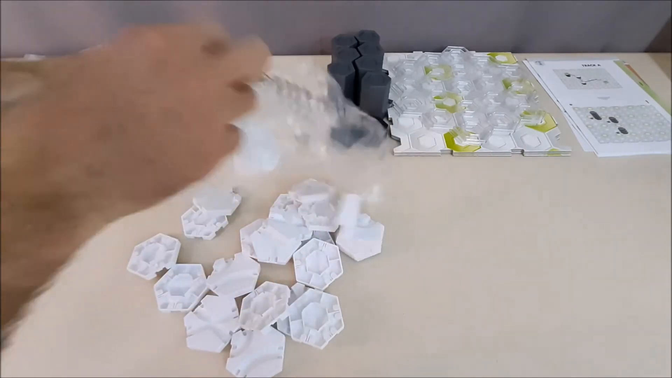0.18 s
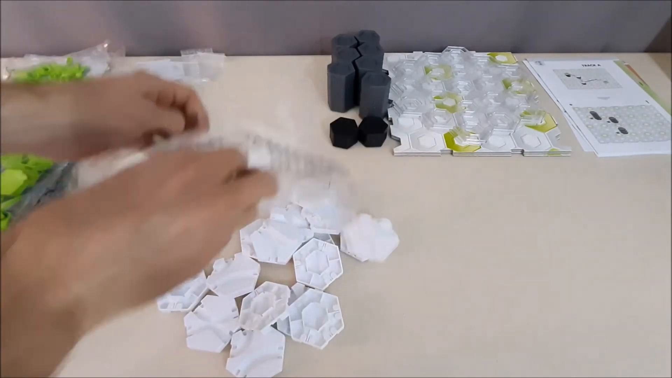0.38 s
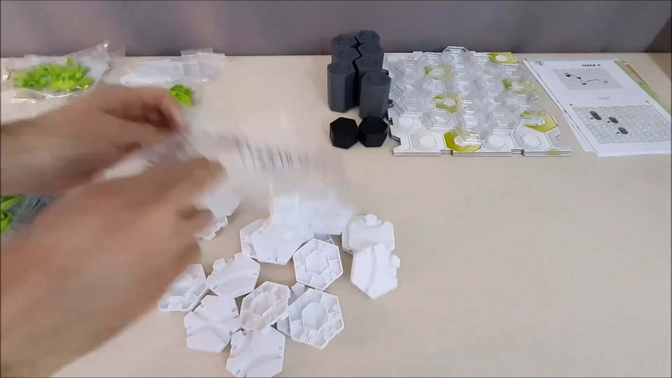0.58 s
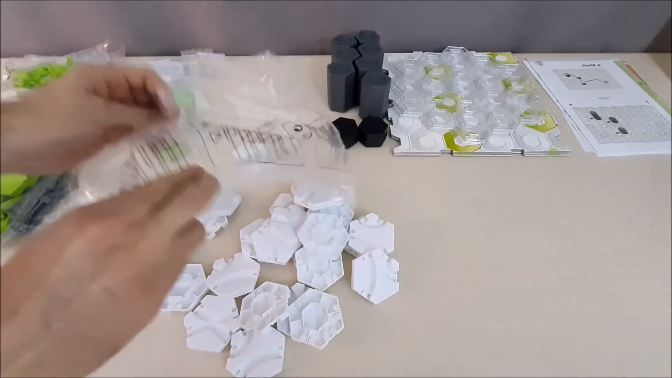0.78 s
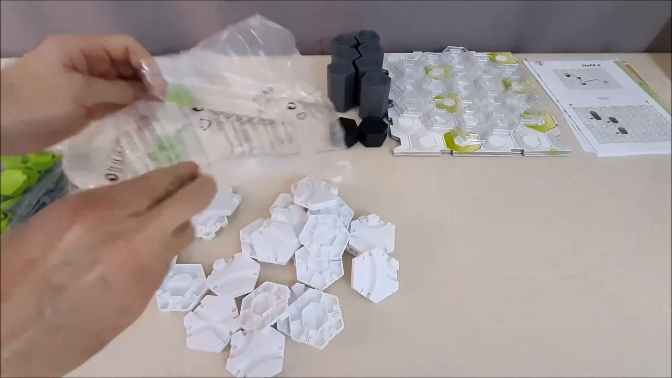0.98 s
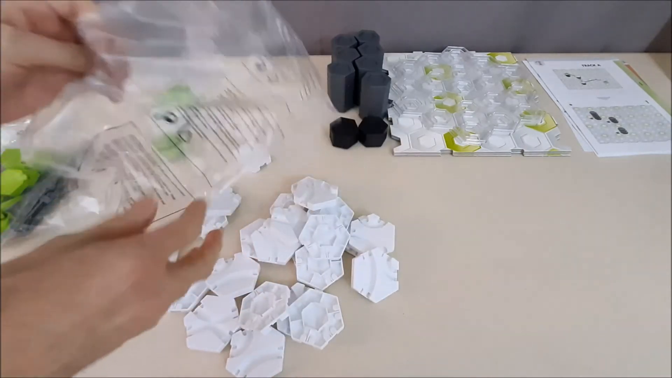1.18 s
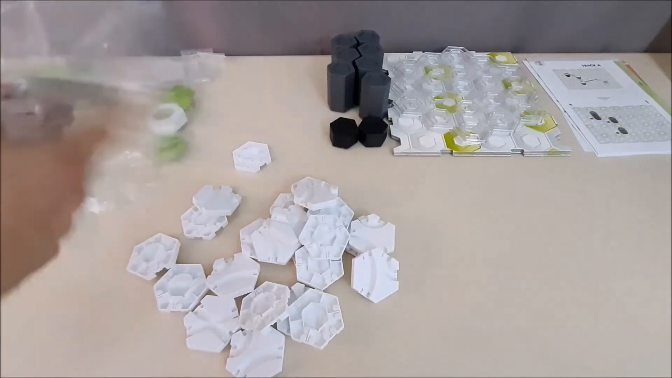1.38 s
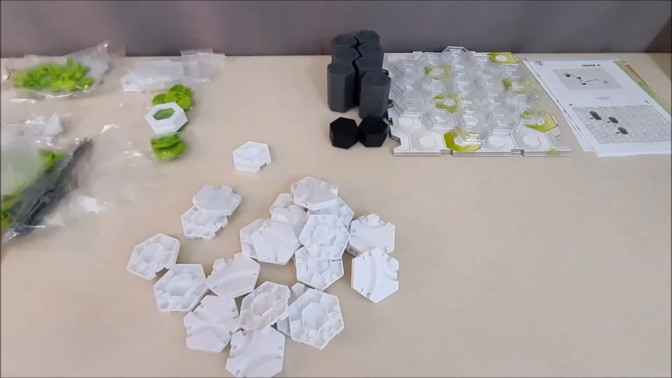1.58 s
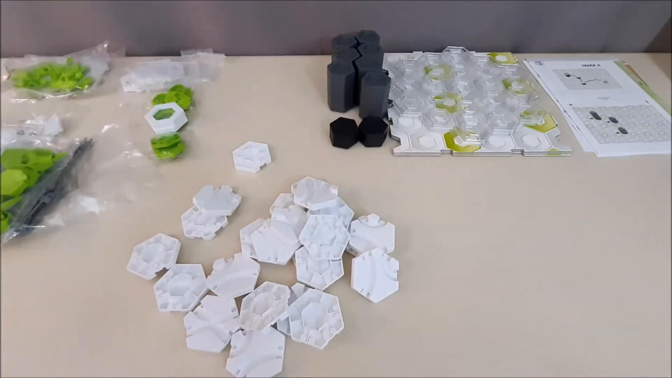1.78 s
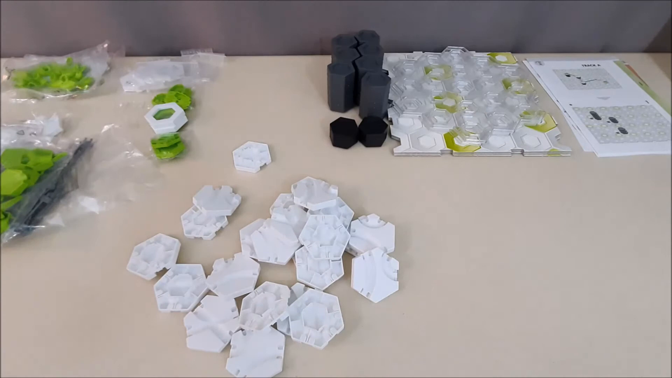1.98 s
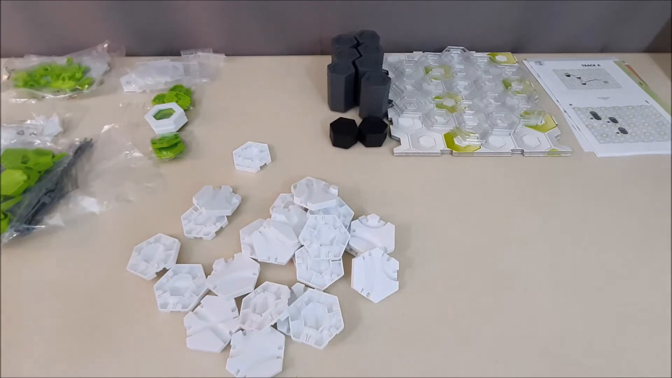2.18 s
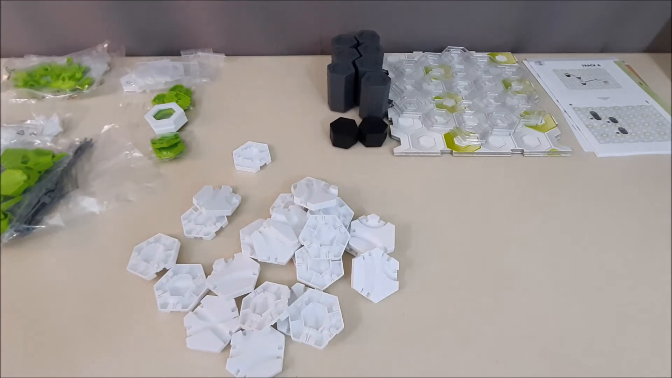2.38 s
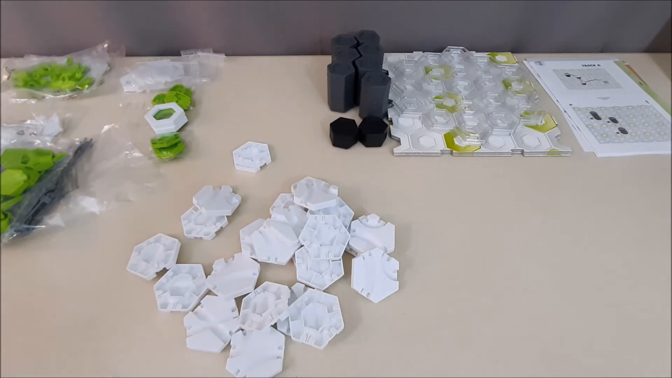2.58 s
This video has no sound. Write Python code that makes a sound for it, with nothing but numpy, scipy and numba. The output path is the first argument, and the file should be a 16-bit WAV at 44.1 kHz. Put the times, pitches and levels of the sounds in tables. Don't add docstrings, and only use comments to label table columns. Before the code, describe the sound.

Hollow plastic tiles clatter from a thin bag onto a table, then the empty bag crinkles

```python
import sys
import numpy as np
from scipy import signal
from scipy.fft import rfft, irfft
from scipy.io import wavfile
from scipy.ndimage import uniform_filter1d, map_coordinates
from numba import njit

SR = 44100
rng = np.random.default_rng(int(sys.argv[2]) if len(sys.argv) > 2 else 0)


def gain_from_db(level_db):
    decades = np.asarray(level_db, float) / 20
    return 10 ** decades


def materialize(psi):
    bounded = np.clip(np.atleast_2d(psi).T, -1, 1)
    quanta = np.round(bounded * 32767).astype(np.int16)
    wavfile.write(sys.argv[1], SR, quanta)


N = 114660

# [f/Hz, level/dB]
HUSH_SPECTRUM = [(18, -25), (30, 9.5), (345, -5), (1280, -1.5), (3500, -6), (8000, -15.5), (16000, -27.5)]
# [t/s, peak/dB]
BUMPS = [(0.033, -43), (0.118, -44), (0.223, -27.5), (0.449, -38), (0.568, -51), (0.719, -31), (0.82, -36),
         (1.121, -45.5), (1.29, -48), (1.35, -33), (1.373, -34.5), (1.392, -31.5), (1.415, -31),
         (1.44, -36.5), (1.465, -42), (1.639, -41), (1.758, -41.5), (1.801, -49)]
# [f/Hz, level/dB, t60/s]
SOFT_MODES = [(60, -9.5, 0.097), (94.8, -4, 0.054), (186, 5.5, 0.034)]
# [t/s, level/dB]
BAG_OPENS = [
    (0, -52.5),
    (.03, -43.5),
    (.15, -41),
    (.18, -47),
    (.21, -43.5),
]
# [t/s, level/dB]
BAG_MOVES = [(1.06, -58.5), (1.148, -43), (1.24, -59.5), (1.311, -42.5), (1.409, -28), (1.5, -34),
             (1.632, -31.5), (1.729, -43), (1.797, -29), (1.86, -38), (1.97, -33.5), (2.098, -37),
             (2.17, -47.5), (2.221, -61.5), (2.301, -41.5), (2.42, -54.5), (2.498, -59.5), (2.6, -74.5)]
# [f/Hz, level/dB]
FILM_SPECTRUM = [(60, -9.5), (600, 1.5), (2050, 1.5), (4500, -1), (7570, -5), (8800, -14.5), (13900, -6.5),
                 (16500, -15)]
# [t/s, peak/dB, f/Hz]
SNAPS = [(0.0278, -30, 2070), (0.0915, -26.5, 3300), (1.063, -34.5, 3980), (1.0965, -42, 5530),
         (1.1086, -34.5, 5040), (1.1175, -29, 3500), (1.134, -33, 6700), (1.1375, -32, 7600),
         (1.1793, -24, 5700), (1.2233, -33, 3920), (1.258, -26.5, 4500), (1.2713, -30.5, 5750),
         (1.2858, -36, 2820), (1.3032, -38, 3710), (1.3125, -25.5, 2830), (1.3202, -20, 3550),
         (1.3411, -24.5, 3600), (1.3778, -21.5, 4570), (1.3977, -15.5, 4630), (1.4073, -19.5, 5550),
         (1.4121, -21, 4400), (1.4493, -20, 7370), (1.4714, -20, 3600), (1.5274, -14.5, 5660),
         (1.5474, -19.5, 2100), (1.5569, -18, 4660), (1.5654, -20, 2040), (1.5808, -20, 4840),
         (1.6232, -17, 1990), (1.7135, -22.5, 4700), (1.7647, -28, 2650), (1.7854, -20, 6100),
         (1.7924, -16, 3850), (1.7996, -11, 7600), (1.8128, -20, 3770), (1.8894, -25, 3970),
         (1.944, -19.5, 4300), (1.9914, -25, 2170), (1.9912, -24, 3880), (2.0374, -25, 2320),
         (2.0617, -24.5, 3300), (2.0954, -26.5, 2020), (2.2736, -38, 4550), (2.468, -44.5, 5350)]
# [f/Hz, level/dB, t60/s]
TILE_MODES = [(1945, 2, 0.049), (2080, -5.5, 0.052), (2710, -11, 0.098), (2800, 7.5, 0.025),
              (2920, -10.5, 0.035), (3110, 5, .025), (3640, -1.5, .02), (4260, -5.5, 0.011),
              (4426, 4, 0.035), (5080, 0, 0.027), (5100, -21.5, .02), (6380, -35.5, 0.005),
              (7520, -17.5, 0.038)]
# [f/Hz, level/dB, t60/s]
RIM_MODES = [(1488, 1, .1), (1527, -2, .07)]
# [f/Hz, level/dB, t60/s]
TABLE_MODES = [(131.7, -10, 0.16), (189.5, -6.5, 0.1), (264, 2, 0.038), (323, -3.5, .05), (389, 8, 0.023),
               (512, 3, 0.041), (607, 5, 0.036), (702, 4.5, 0.033), (798, 10, 0.027), (1007, 8, 0.032),
               (1192, -5.5, 0.059)]
# [f/Hz, level/dB]
CRACK_SPECTRUM = [(150, -17.5), (800, -2.5), (2500, 7), (5000, 1.5), (7800, -3.5), (8900, -10.5),
                  (13000, -3.5), (16000, -20)]
# [t/s, level/dB]
CHATTER = [(.22, -33.5), (.27, -34), (.33, -42), (.41, -51), (.437, -59.5), (.45, -31.5), (.5, -49),
           (.562, -52.5), (.575, -38), (.7, -32), (.74, -42), (.775, -40), (.8, -36.5), (.84, -45.5),
           (.9, -50), (.97, -63.5), (1.05, -91)]
# [t/s, peak/dB]
ROCKS = [
    (0.641, -20),
    (0.6956, -20),
    (0.721, -32),
    (0.7534, -36),
    (0.7844, -20.5),
    (0.8065, -25),
    (0.829, -35),
    (0.857, -29),
    (0.889, -22.5),
    (0.9353, -40),
]
# [t/s, peak/dB, table thud/dB, loudest ring f/Hz, crack/dB]
DROPS = [(0.213, -17, -17.5, 4400, -10), (0.2213, -6, -20, 2816, -4),
         (0.2245, -10, -28.5, 5610, -6.5), (0.231, -10, -21.5, 2730, -8.5),
         (0.24, -8, -25.5, 5320, -3.5), (0.2425, -9.5, -30.5, 2700, -9), (0.25, -10, -22.5, 2800, -7),
         (0.258, -7.5, -15.5, 2640, -6), (0.265, -13.5, -19, 2750, -10), (0.273, -7, -32, 2724, -19),
         (0.2855, -15, -23, 2640, -8.5), (0.2915, -8.5, -25, 2850, -18.5),
         (0.301, -14.5, -12.5, 4380, -16), (0.309, -15.5, -16.5, 2770, -18),
         (0.3485, -18, -13.5, 2680, -20), (0.372, -26.5, -11, 2940, -21),
         (0.4158, -13.5, -21, 3190, -14), (0.4165, -20, -26.5, 4980, -11),
         (0.438, -19.5, -24.5, 4400, -6), (0.4412, -14, -18, 3060, -5),
         (0.4463, -3.5, -25, 2920, -22.5), (0.4922, -28, -19, 2890, -23),
         (0.5256, -29.5, -12.5, 2580, -21.5),
         (0.568, -9.5, -8.5, 925, -14.5), (0.575, -15.5, -14.5, 820, -17.5),
              (0.584, -4, -23.5, 2790, -23.5), (0.591, -9, -13, 2800, -21),
              (0.6106, -11.5, -15, 4040, -12.5), (0.615, -12, -15.5, 2720, -18.5),
              (0.639, -16, -14.5, 1550, -12.5), (0.6458, -13.5, -8.5, 4100, -0.5),
              (0.654, -14.5, -21.5, 2670, -16), (0.66, -9.5, -24, 1990, -15.5),
              (0.664, -17, -19, 4480, -13), (0.678, -12.5, -17, 2740, -3), (0.692, -14, -26, 4490, -3),
              (0.696, -14, -14.5, 2260, -6), (0.708, -19, -16.5, 2840, -12), (0.715, -20.5, -24, 3450, 1.5),
              (0.761, -22.5, -13.5, 2020, -4.5), (0.7804, -11, -21, 3026, -9),
              (0.787, -14.5, -18.5, 2760, -21.5), (0.815, -21, -22, 3150, -13),
              (0.8485, -16, -30, 2020, -21), (0.8708, -11.5, -20.5, 2777, -25.5),
              (0.88, -14.5, -16, 2670, -22), (0.888, -18.5, -13, 2930, -51), (0.954, -31, -8.5, 3580, -20)]

TILE_RISE_S, TILE_DETUNE = 0.0005, 0.039


def unit(x):
    return x / np.sqrt(np.mean(x ** 2))


def colour(x, points):
    p = np.array(points, float)
    hz = np.maximum(np.arange(1025) * SR / 2048, 10)
    gain_db = np.interp(np.log(hz), np.log(p[:, 0]), p[:, 1])
    cepstrum = irfft(np.log(gain_from_db(gain_db)))
    cepstrum[1:1024] *= 2
    cepstrum[1025:] = 0
    response = irfft(np.exp(rfft(cepstrum)))
    if x.ndim > 1:
        response = response[None]
    return signal.fftconvolve(x, response)[..., :N]


def walk(rate_hz):
    hold = int(SR / rate_hz)
    levels = np.repeat(rng.standard_normal(N // hold + 1), hold)
    return uniform_filter1d(levels, hold)[:N]


def train(times_s, sizes):
    i = np.clip((np.asarray(times_s) * SR).astype(int), 0, N - 1)
    return np.array([np.bincount(i, s, N) for s in np.atleast_2d(sizes)])


def clicks(per_s, scatter_db):
    u = rng.random((3, N))
    happens = u[0] < per_s / SR
    return unit(happens * np.sign(u[1] - .5) * gain_from_db(-scatter_db * np.log(u[2] + .05)))


def burst(times_s, db, t60_s):
    pole = np.exp(-np.log(1000) / (t60_s * SR))
    env = signal.lfilter([1], [1, -pole], train(times_s, gain_from_db(db)))
    n = rng.standard_normal((3, N))
    return 0.26 * env * (n[0] + 2.19 * n[1:])


@njit
def decays(start, pole, rise, size, n):
    out = np.zeros((2, n))
    for k in range(len(start)):
        z, a, i = 1 + 0j, 1., start[k]
        while z.real ** 2 + z.imag ** 2 > 1e-5 and i < n:
            z, a = z * pole[k], a * rise
            v = z.imag * (1 - a)
            out[0, i] += v * size[0, k]
            out[1, i] += v * size[1, k]
            i += 1
    return out


def ring(times_s, db, modes, scatter_db, rise_s, detune=TILE_DETUNE):
    chance = rng.standard_normal((len(times_s), len(modes), 3))
    columns = ([np.broadcast_to(m[c], len(times_s)) for m in modes] for c in range(3))
    hz, mode_db, t60_s = (np.array(column, float).T for column in columns)
    side = .5 * np.minimum(hz / 2500, 1) * chance[..., 1]
    size = gain_from_db(np.asarray(db)[:, None] + mode_db + scatter_db * chance[..., 0])
    size = size * np.array([1 + side, 1 - side])
    tuned_hz = hz * (1 + detune * chance[..., 2])
    pole = np.exp(2j * np.pi * tuned_hz / SR - np.log(1000) / (t60_s * SR))
    start = np.repeat((times_s * SR).astype(np.int64), len(modes))
    rise = np.exp(-1 / (rise_s * SR))
    return decays(start, pole.ravel(), rise, size.reshape(2, -1), N) / np.sqrt(len(modes))


def hush():
    return gain_from_db(-72) * unit(colour(rng.standard_normal((2, N)), HUSH_SPECTRUM))


def room(x):
    t60_s, treble_t60_s, first_echo_s, level_db = 0.29, 0.28, 0.0025, -9.5
    split_hz, top_hz, alike_hz = 6500, 6000, 300
    t = np.arange(int(.5 * SR)) / SR
    tail = rng.standard_normal((2, len(t))) * gain_from_db(-60 * t / t60_s) * (t > first_echo_s)
    dull = signal.lfilter(*signal.butter(2, split_hz, fs=SR), tail)
    tail = dull + (tail - dull) * gain_from_db(-60 * t / treble_t60_s)
    tail = signal.lfilter(*signal.butter(1, top_hz, fs=SR), tail)
    tail = tail - signal.lfilter(*signal.butter(2, alike_hz, fs=SR), tail - tail[0])
    tail = tail / np.sqrt((tail ** 2).sum(1, keepdims=True))
    return gain_from_db(level_db) * signal.fftconvolve(x.mean(0, keepdims=True), tail)[:, :N]


def bumps():
    t, db = np.array(BUMPS).T
    return ring(t, db + 3.5, SOFT_MODES, 0.86, rise_s=0.0021, detune=0.19)


def bag_film(now):
    creases_per_s, crease_scatter_db = 500, 7
    ticks_per_s, ticks_db, rustle_db, width, flutter_db = 630, -15.5, -4, 0.94, 1.5
    film, broad, flutter = 0, clicks(creases_per_s, crease_scatter_db), walk(60)
    bass_loss_db = 9 * np.maximum(now - 1.45, 0) + 0.5 * (now < .5)
    treble_db = -3.5 * np.clip((now - 2.15) / .1, 0, 1)
    for hz in 60 * 2 ** np.arange(0, 8.1, .5):
        sos = signal.butter(1, [hz / 1.19, hz * 1.19], "band", fs=SR, output="sos")
        ticks = clicks(ticks_per_s * hz / 8000 + 60, crease_scatter_db)
        n = rng.standard_normal((3, N))
        rustle = gain_from_db(rustle_db) * n[0] + width * np.sqrt(hz / 1000) * n[1:]
        band = signal.sosfilt(sos, broad + gain_from_db(ticks_db) * ticks + rustle)
        band_db = flutter_db * (flutter + walk(25)) - bass_loss_db * (hz < 1300) + treble_db * (hz > 8000)
        film = film + band * gain_from_db(band_db)
    handling = np.vstack([BAG_OPENS, [(.23, -90), (1.045, -85)], BAG_MOVES])
    return unit(colour(film, FILM_SPECTRUM)) * gain_from_db(np.interp(now, *handling.T))


def bag_snaps():
    t, db, hz = np.array(SNAPS).T
    puffs = signal.lfilter([1, -0.77], [1], burst(t, db + 8, t60_s=0.0082))
    return colour(puffs, FILM_SPECTRUM) + ring(t, db - 4, [(hz, 0, 0.0084)], 0, rise_s=0.0004, detune=0)


def bag():
    lag_s, pan_db = 0.000517, 2.5
    now = np.arange(N) / SR
    sound = bag_film(now) + bag_snaps()
    left = np.interp(now, [.6, 1.2, 2.2], [0, .65, 1]) + 0.11 * walk(8.9)
    out = sound * gain_from_db(pan_db * left * np.array([[.5], [-.5]]))
    late_right = map_coordinates(out[1], [(now - lag_s * left) * SR], mode="mirror")
    return np.array([out[0], late_right])


def blows(t, db, thud_db, crack_db):
    body = ring(t, db, TILE_MODES, 2.5, TILE_RISE_S)
    rim = ring(t, db - 22, RIM_MODES, 2.1, TILE_RISE_S, 0.003)
    table = ring(t, db + thud_db + 5, TABLE_MODES, 2.37, rise_s=0.00086)
    crack = colour(burst(t, db + crack_db + 7, t60_s=0.032), CRACK_SPECTRUM)
    return body + rim + table + crack


def chatter():
    chance = rng.random((520, 2))
    when = .222 + np.cumsum(-np.log(chance[:, 0])) / 600
    size_db = np.interp(when, *np.array(CHATTER).T) - 2.5 * np.log(chance[:, 1])
    return blows(when, size_db + 1, thud_db=-6.5, crack_db=-10.5)


def rocking_tile():
    taps = ring(*np.array(ROCKS).T, RIM_MODES, 0, rise_s=0.00077, detune=0.0023)
    return taps * gain_from_db(2.3 * walk(90.55))


def tile_drops():
    t, db, thud_db, hz, crack_db = np.array(DROPS).T
    loudest = ring(t, db - 4, [(hz, 0, 0.024)], 0, TILE_RISE_S, detune=0)
    return blows(t, db - 12.5, thud_db + 13, crack_db + 10) + loudest


def tiles():
    table_low_cut = signal.butter(4, 122, "high", fs=SR, output="sos")
    return signal.sosfilt(table_low_cut, chatter() + rocking_tile() + tile_drops())


def scene():
    near = bumps() + bag() + tiles()
    return hush() + room(near) + near


def roll_off(x):
    return signal.sosfilt(signal.butter(12, 16980, fs=SR, output="sos"), x)


def record(dry):
    low_cut = signal.butter(2, 46.4, "high", fs=SR, output="sos")
    top_cut = signal.ellip(8, .3, 40, 15950, fs=SR, output="sos")
    mix = signal.sosfilt(top_cut, signal.sosfilt(low_cut, np.tanh(dry)))
    return roll_off(mix)


dry = scene()
out = record(dry)
materialize(out)
```